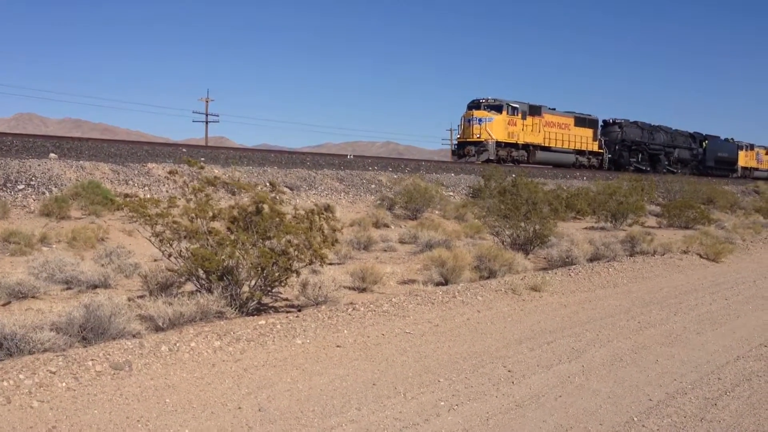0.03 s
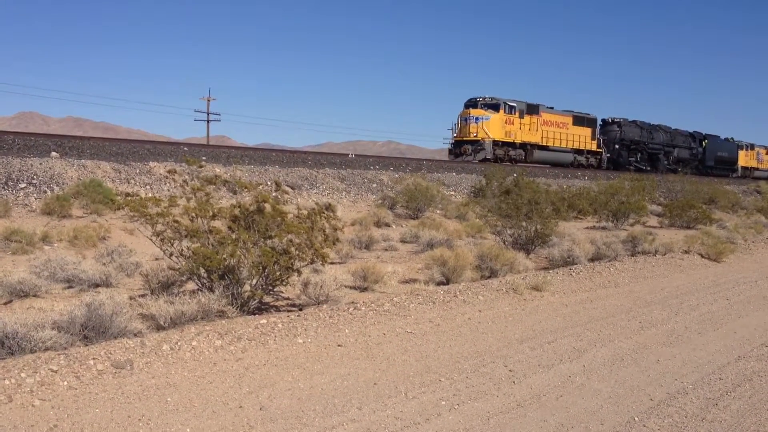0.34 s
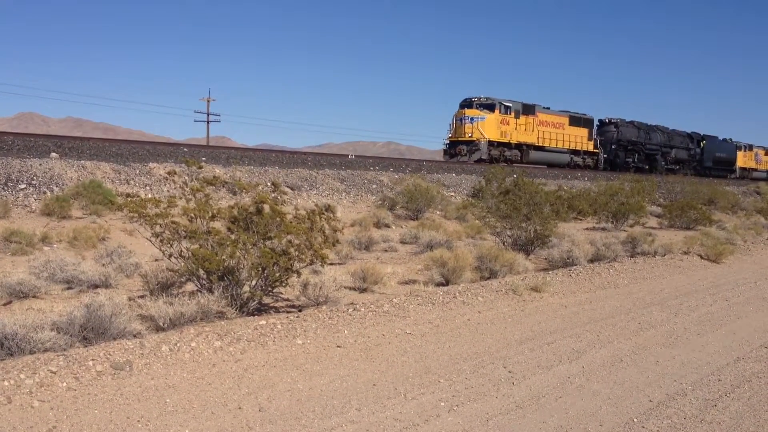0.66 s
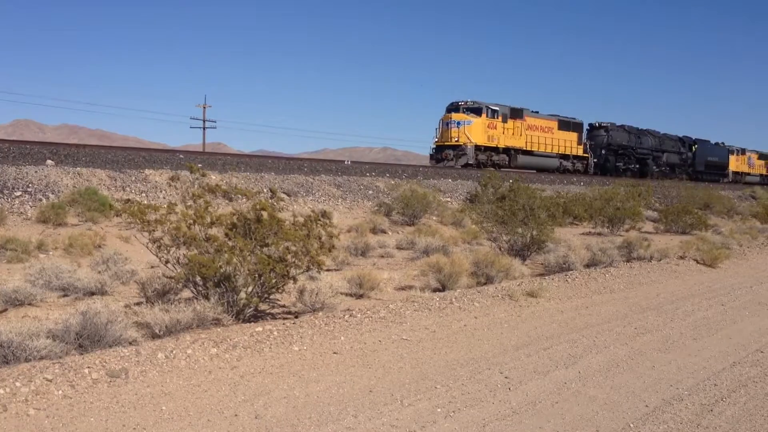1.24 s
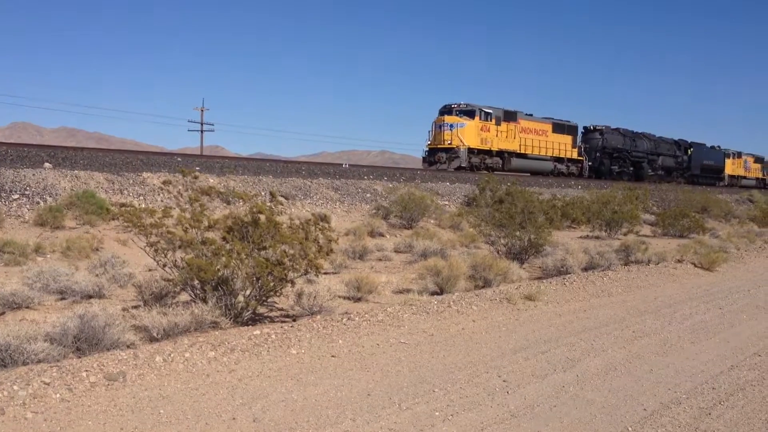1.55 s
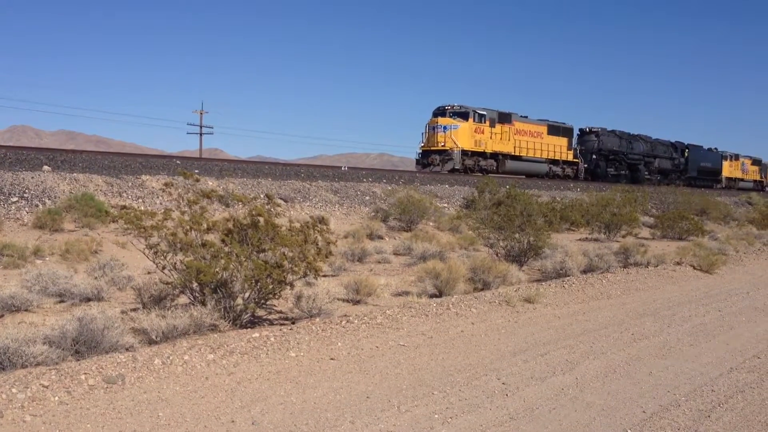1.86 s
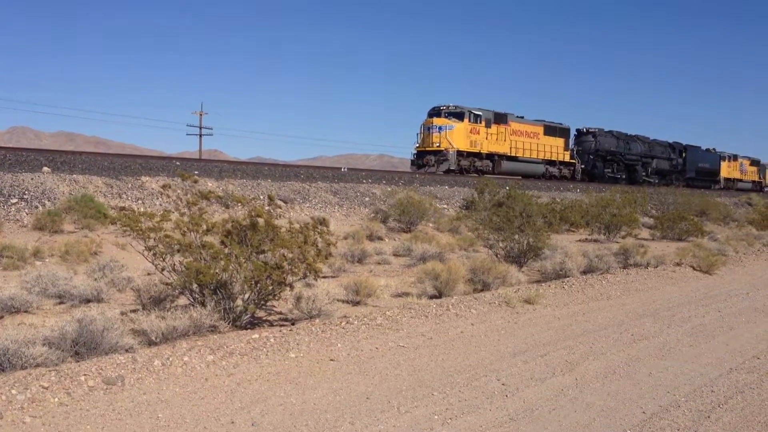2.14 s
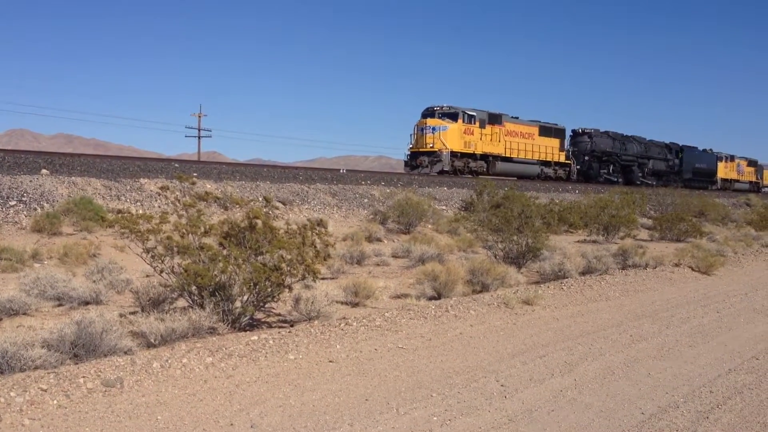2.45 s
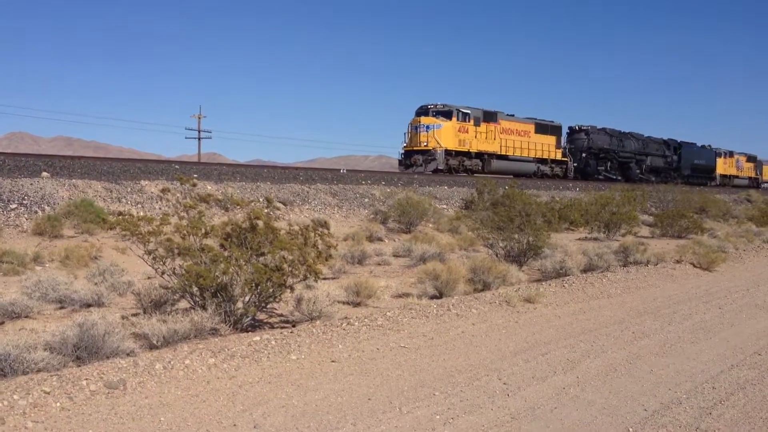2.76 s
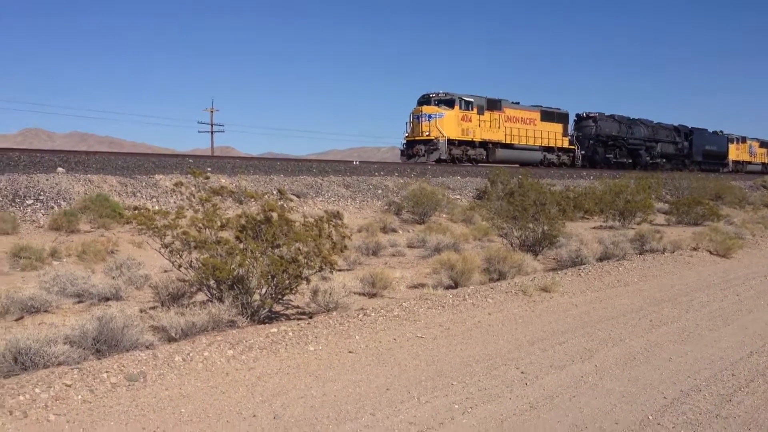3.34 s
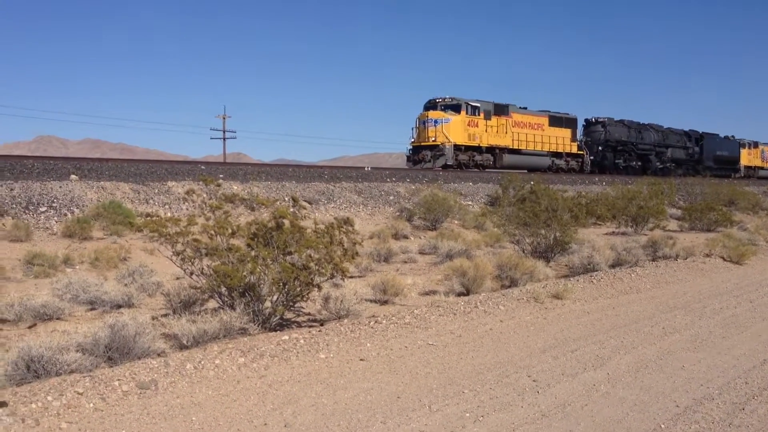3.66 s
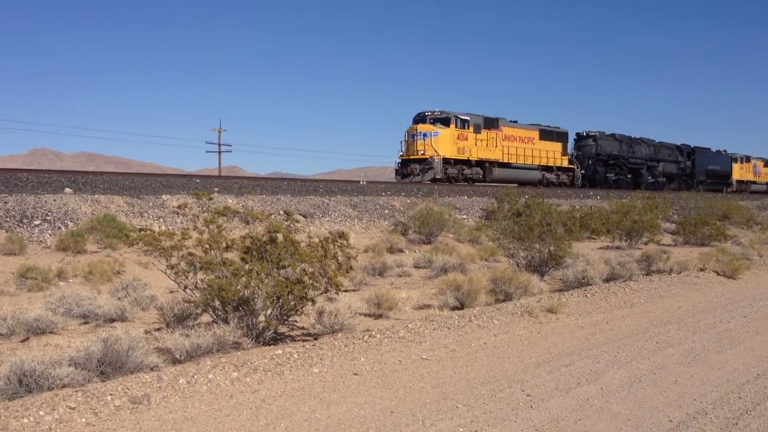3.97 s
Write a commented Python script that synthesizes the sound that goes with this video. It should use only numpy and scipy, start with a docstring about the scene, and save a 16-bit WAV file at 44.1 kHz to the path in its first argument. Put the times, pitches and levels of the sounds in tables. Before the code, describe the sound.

A train bell clangs evenly above a low engine drone, with one burst of air.

```python
"""Locomotive bell in the desert

A diesel locomotive rolls slowly closer, ringing its bell. An air-driven clapper strikes evenly,
exciting pairs of modes that beat, and its valve puffs between strokes. The engine drones, steam
hisses and one burst of air is let off. Wind buffets the microphone, mostly towards the end."""
import sys
import numpy as np
from scipy import signal
from scipy.fft import rfft, irfft
from scipy.io import wavfile

SR = 44100
rng = np.random.default_rng(int(sys.argv[2]) if len(sys.argv) > 2 else 0)


def wrap_up_sound(samples):
    """Save the sound to the file named by the first command line argument, as 16-bit audio."""
    columns = np.atleast_2d(samples).T
    # keep every value between -1 and 1, then stretch to whole-number steps
    tamed = np.clip(columns, -1, 1)
    steps = np.round(tamed * 32767).astype(np.int16)
    wavfile.write(sys.argv[1], SR, steps)


N = 176400
T = np.arange(N) / SR

# Clapper strokes. Each row: start in seconds, gains of the bell's hum, clang, overtones and top in dB,
# factor on the hum's beating, extra rise time of the ringing mode and delay of the beat crest in seconds.
STROKES = [(-.012, -11, -13.5, -9, -6, 0.67, 0.0089, 0.06), (0.792, -4, -6, -4.5, -6.5, 0.82, 0.063, 0.043),
           (1.5868, -0.5, 2, -1, 0.5, 0.31, 0.014, 0.065), (2.389, -0.5, -1, 0.5, -1.5, 0.34, 0.024, 0.068),
           (3.188, -3, -1.5, 2, -0.5, 0.37, 0.048, 0.12), (3.985, 2.5, 2.5, 6.5, 7.5, .2, 0.013, .06)]


def amp(db):
    """Decibels become an amplitude ratio."""
    return 10 ** (np.asarray(db) / 20)


def unit(x):
    """Normalisation to an rms of 1."""
    return x / np.sqrt(np.mean(abs(x) ** 2) + 1e-20)


def noise(colour):
    """Spectral shaping of white noise, rms 1. Each colour row: frequency in Hz, relative level in dB."""
    hz, db = np.transpose(colour)
    f = np.fft.rfftfreq(N, 1 / SR)
    gain = amp(np.interp(np.log(f + 1), np.log(hz), db))
    return unit(irfft(rfft(rng.standard_normal(N)) * gain, N))


def drift(rate_hz):
    """Low-pass filtered noise: a slow random fluctuation of rms 1."""
    f = np.fft.rfftfreq(4096, 1 / 500)
    slow = irfft(rfft(rng.standard_normal(4096)) / np.sqrt(1 + (f / rate_hz) ** 4))
    return np.interp(T, np.arange(len(slow)) / 500, unit(slow))


def ring(start, rise, t60):
    """Exponential build-up and damping; the decay loses 60 dB in t60 seconds."""
    age = np.maximum(T - start, 0)
    return (1 - np.exp(-age / rise)) * np.exp(-np.log(1000) * np.minimum(age / t60, 10))


def jet(colour, levels, flicker_hz, flicker_db=0.9):
    """Turbulence makes a flickering hiss. Each row of levels: time in seconds, level in dB."""
    envelope = amp(np.interp(T, *np.transpose(levels)))
    return noise(colour) * envelope * amp(flicker_db * drift(flicker_hz))


def bell(shimmer_db=1.88, shimmer_hz=5.3, scatter_depth=0.19, scatter_hz=25.5):
    """Struck pairs of close modes interfere and beat; moving air and scattering make them shimmer."""
    # Each row: frequency in Hz, level in dB, 60 dB decay time and rise time in seconds,
    # beat rate against the twin mode in Hz, relative amplitude of the twin.
    modes = [(1136.4, -28, 4.98, .005, 1.39, 0.84), (2137, -14.5, .36, 0.0052, 2.6, 0.038),
             (2444.3, -17, 1.313, 0.0076, 4.32, 0.3), (3812, -41.5, 1.3, 0.017, 4.9, 0.16),
             (4050, -33.5, 1.16, 0.0057, 7.6, 0.19), (5160, -47.5, 0.2, 0.0024, 6, 0.24),
             (5990, -49.5, 0.88, 0.012, 10, 0.19), (7900, -52, 0.55, .004, 6.9, .3),
             (8150, -45, 1.4, 0.0059, 15.1, 0.38), (9600, -60, .3, 0.0035, 8, .3),
             (10456, -50, 1.2, 0.0044, 13, 0.19), (12890, -64, .35, 0.0046, 10, .3)]
    registers_hz = [1140, 2100, 2500, 3800, 6000, 7900]  # hum, clang range, overtone range, top
    out = np.zeros(N)
    for hz, db, t60, rise, beat_hz, twin in modes:
        mode = np.zeros(N, complex)
        is_hum, is_ringing = hz < 1575, 2300 < hz < 2600
        for start, hum_db, clang_db, over_db, top_db, hum_beat, swell, crest in STROKES:
            age = np.maximum(T - start, 0)
            attack = rise + swell * is_ringing
            stroke_db = np.interp(hz, registers_hz, [hum_db, clang_db, clang_db, over_db, over_db, top_db])
            share, lag = (twin * hum_beat, 0) if is_hum else (twin, crest)
            pair = 1 + share * np.exp(2j * np.pi * beat_hz * (age - lag))
            phase = np.exp(2j * np.pi * rng.random())
            mode *= np.exp(-np.minimum(age / attack, 20))  # the old vibration yields to the new
            mode += amp(db + stroke_db) * ring(start, attack, t60) * pair * phase
        # Both fluctuations deepen with frequency.
        shimmer = amp(shimmer_db * np.sqrt(hz / 2500) * drift(shimmer_hz))
        scatter = 1 + scatter_depth * hz / 3800 * (drift(scatter_hz) + 1j * drift(scatter_hz))
        out += (mode * shimmer * scatter * np.exp(2j * np.pi * hz * T)).real
    return out


def clapper(gain_db=-23.5):
    """A brief impact has a broad spectrum: the clapper clanks on the rim."""
    colour = [(500, -30), (1500, -12), (2300, 11.5), (3200, -12.5), (5500, -23), (8000, -21), (15000, -33)]  # Each row: frequency in Hz, relative level in dB.
    impacts = sum(amp(gain_db + clang_db) * ring(start, rise=0.00089, t60=0.058)
                  for start, _, clang_db, *_ in STROKES)
    return noise(colour) * impacts


def engine(rumble_db=-39.5, lumps_db=1.0, waver_db=3.5):
    """Engine and wheels rumble in broadband noise; random modulation broadens the engine's tones."""
    colour = [(20, -32), (40, -31), (60, -11.5), (90, -1), (150, 3.5), (280, 0.5), (380, 3), (560, -3),
              (700, 1), (900, -2.5), (1600, -2), (2200, -15.5), (3000, -22), (4300, -33), (5600, -41),
              (15000, -58)]  # Each row: frequency in Hz, relative level in dB.
    tones = [(80.4, -66, 1.5), (159.4, -47, 3.35), (252.7, -55.5, 4.6), (320.4, -49.5, 2.3),
             (373, -52.5, 8.2), (737.6, -48.5, 9.4), (866, -66.5, 5), (987, -63.5, 11.6), (1634, -56.5, 9),
             (1899, -48, 9.4)]  # Each row: frequency in Hz, level in dB, width in Hz.
    out = amp(rumble_db) * noise(colour) * amp(lumps_db * drift(30))
    for hz, db, width_hz in tones:
        pitch_hz = hz + .5 * width_hz * drift(2 * width_hz)
        cycles = np.cumsum(pitch_hz) / SR + rng.random()
        waver = amp(waver_db * drift(width_hz))
        out += amp(db) * unit(waver * np.sin(2 * np.pi * cycles))
    return out


def steam():
    """A turbulent jet of steam hisses throughout, swelling and sinking."""
    colour = [(800, -16), (2000, 9), (3000, 1), (4200, -6.5), (5600, -18.5), (6500, -19.5), (7700, -10.5),
              (9500, -18.5), (12000, -20.5), (15000, -23)]  # Each row: frequency in Hz, relative level in dB.
    levels = [(0, -51), (.55, -54.5), (.8, -47), (1.15, -41), (1.35, -42), (1.52, -51), (1.9, -43.5),
              (2.2, -47), (2.6, -46), (2.85, -45.5), (3.1, -44), (3.4, -43.5), (3.7, -43), (4, -42)]  # Each row: time in seconds, level in dB.
    return jet(colour, levels, flicker_hz=7)


def wind(flutter_db=9, flutter_exponent=1.91, lumps_db=1.0, lumps_hz=45, low_cut_hz=76):
    """Turbulent pressure buffets the microphone, brighter when stronger; the hardest eddies thump."""
    gusts = [(0.168, 0.013, -36), (1.45, 0.049, -42), (2.733, 0.0062, -26.5), (2.868, 0.011, -27.5),
             (2.766, 0.034, -42.5), (2.993, 0.029, -27.5), (3.086, 0.064, -36), (3.332, 0.033, -31.5),
             (3.379, 0.034, -29), (3.443, 0.0068, -25.5), (3.563, 0.066, -27), (3.637, 0.021, -20),
             (3.692, 0.038, -20), (3.841, 0.046, -20), (3.899, 0.054, -21), (3.93, 0.0088, -12),
             (3.952, 0.027, -24)]  # Each row: centre and Gaussian width in seconds, level in dB.
    # Deep and brighter wind spectra. Each row: frequency in Hz, relative level in dB.
    buffet_colour = [(25, -29), (60, -18.5), (110, -7), (175, 0), (260, -4.5), (400, -16), (600, -37),
                     (1200, -46), (4000, -79)]
    flutter_colour = [(100, -7), (330, 7.5), (600, -6), (1000, -11), (1600, -15), (3000, -57), (8000, -65)]
    thumps = [(3.6705, -9, 468, 0.0023), (3.6985, -7.5, 353, 0.0036), (3.9245, -3.5, 605, 0.0014),
              (3.9363, 1, 370, 0.0021)]  # Each row: start in seconds, level in dB, pitch in Hz, decay in seconds.
    pulses = [amp(db) * np.exp(-.5 * ((T - centre) / width) ** 2) for centre, width, db in gusts]
    force = np.sqrt(sum(pulse ** 2 for pulse in pulses))  # gusts add in power
    buffet = force * noise(buffet_colour)
    flutter = amp(flutter_db) * force ** flutter_exponent * noise(flutter_colour)
    out = (buffet + flutter) * unit(amp(lumps_db * drift(lumps_hz)))
    for start, db, hz, decay in thumps:
        age = np.maximum(T - start, 0)
        envelope = np.minimum(2 * hz * age, 1) * np.exp(-np.minimum(age / decay, 20))
        out += amp(db) * envelope * np.sin(2 * np.pi * hz * age)
    return signal.lfilter(*signal.butter(2, low_cut_hz, "high", fs=SR), out)


def valve(rise_s=0.0018, tail_db=-17):
    """The ringer exhausts between strokes: each turbulent puff decays fast and leaves a faint tail."""
    colour = [(1000, -5), (2200, 17), (4000, -7), (5800, -6), (8000, -2), (10000, -4), (12500, 0),
              (14000, -6), (15000, 4)]  # Each row: frequency in Hz, relative level in dB.
    puffs = [(.511, -38.5), (1.309, -27), (2.108, -23.5), (2.906, -26), (3.703, -27.5)]  # Each row: start in seconds, level in dB.
    envelope = np.zeros(N)
    for start, db in puffs:
        tail = amp(tail_db) * ring(start, rise_s, t60=0.21)
        envelope += amp(db) * (ring(start, rise_s, t60=0.03) + tail)
    return noise(colour) * envelope


def air_release():
    """Compressed air expands in one short burst of bright jet noise."""
    colour = [(500, -27), (1300, 4), (2200, 6.5), (3200, 4), (4200, 4), (5600, -7), (7400, 3.5), (9500, 1),
              (11500, 3), (15000, -3.5)]  # Each row: frequency in Hz, relative level in dB.
    levels = [(2.10, -73), (2.118, -42.5), (2.17, -38), (2.235, -32), (2.32, -31.5), (2.41, -31),
              (2.47, -40), (2.52, -51), (2.58, -75)]  # Each row: time in seconds, level in dB.
    return jet(colour, levels, flicker_hz=40)


def scene():
    """Superposition in the open air: all sources add in one channel."""
    jets = steam() + air_release()
    ringing = bell() + clapper() + valve()
    return (jets + ringing + engine() + wind())[None]


def record(dry, cutoff_hz=15370):
    """Band limiting: a steep low-pass filter removes the highest treble."""
    low_pass = signal.firwin(1023, cutoff_hz, window=("kaiser", 9), fs=SR)
    return signal.oaconvolve(dry, low_pass[None], "same")


dry = scene()
out = record(dry)
wrap_up_sound(out)
```